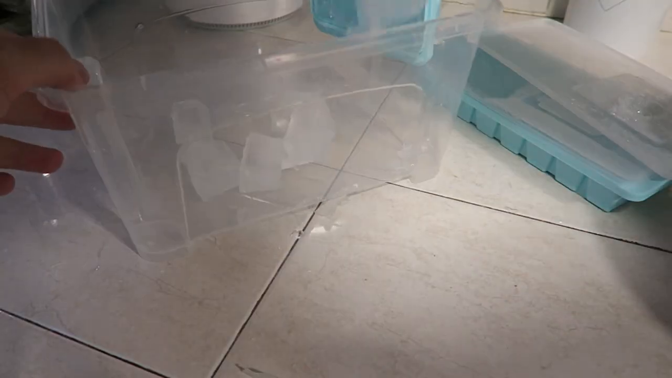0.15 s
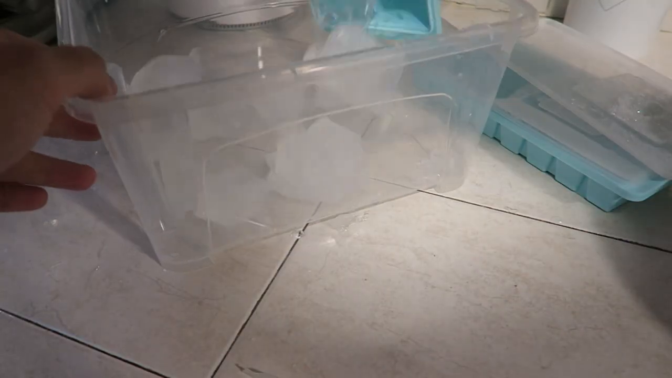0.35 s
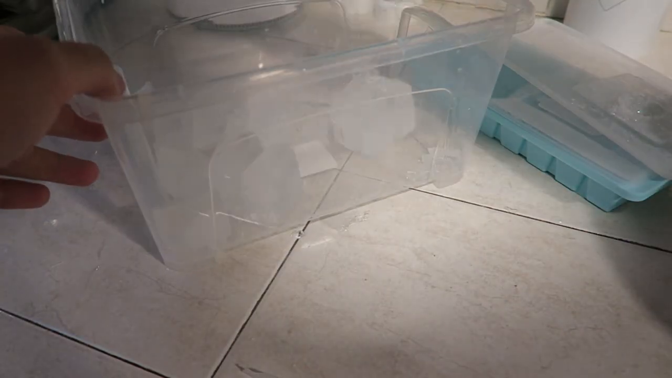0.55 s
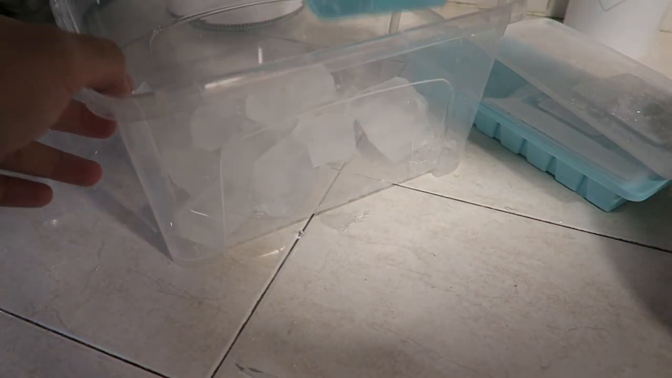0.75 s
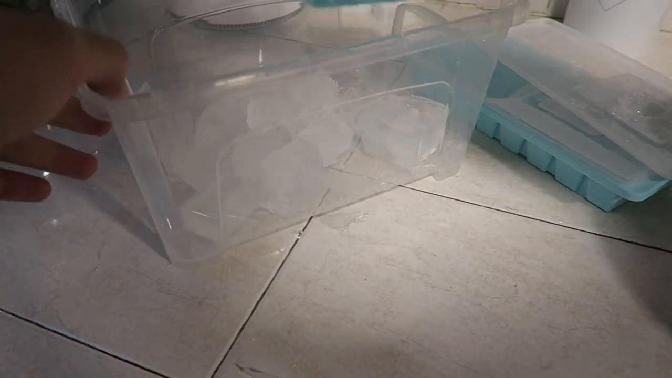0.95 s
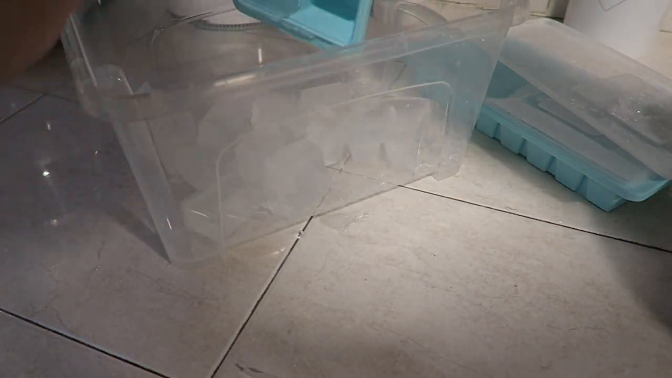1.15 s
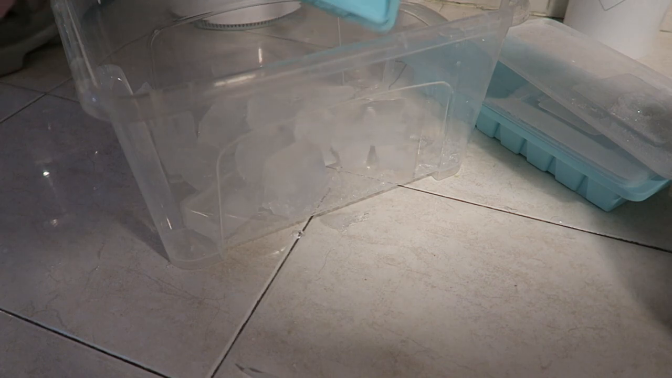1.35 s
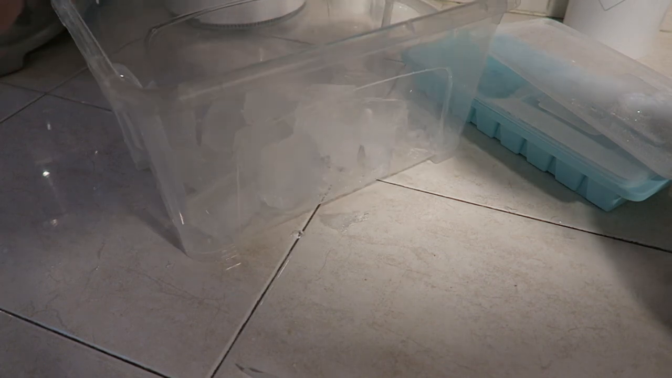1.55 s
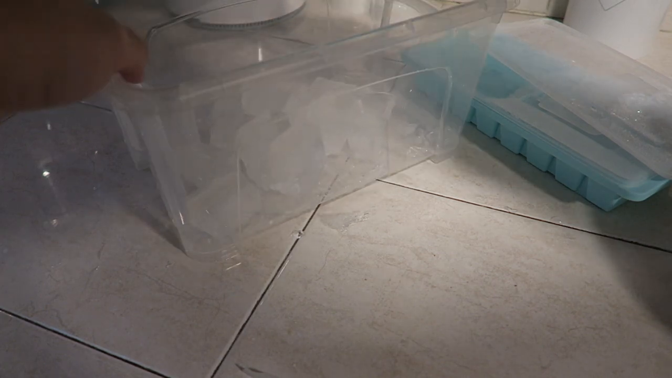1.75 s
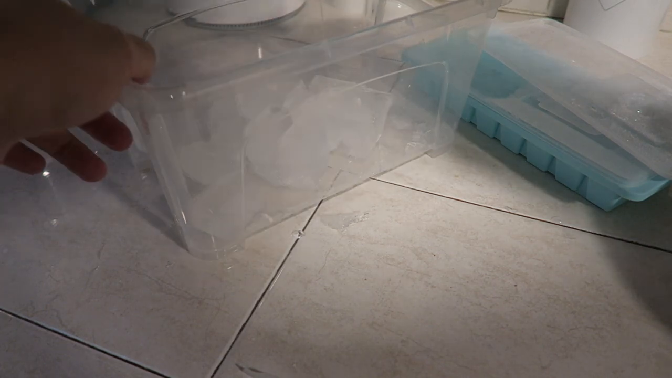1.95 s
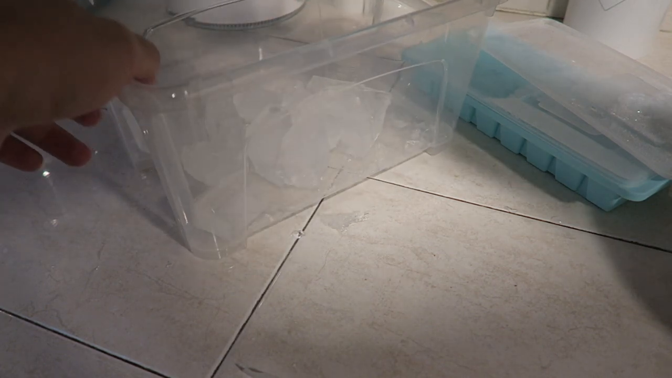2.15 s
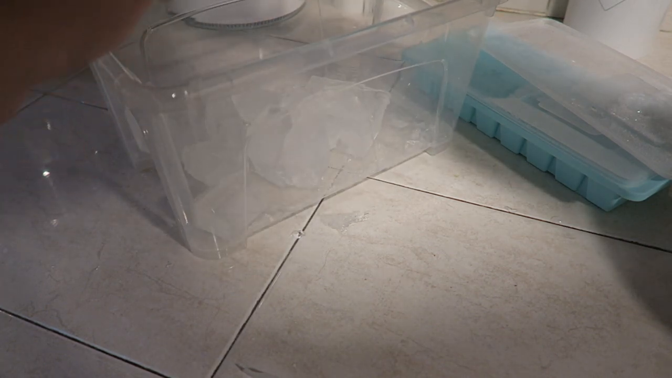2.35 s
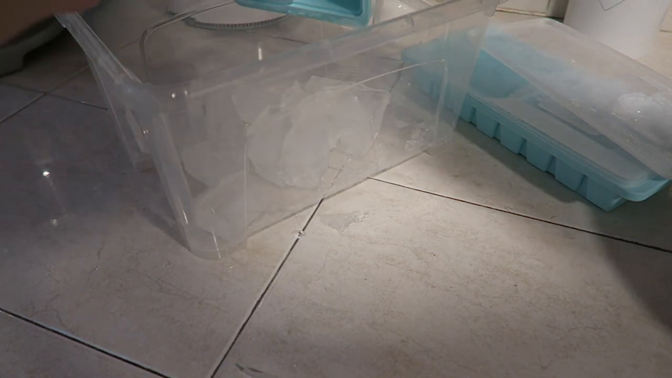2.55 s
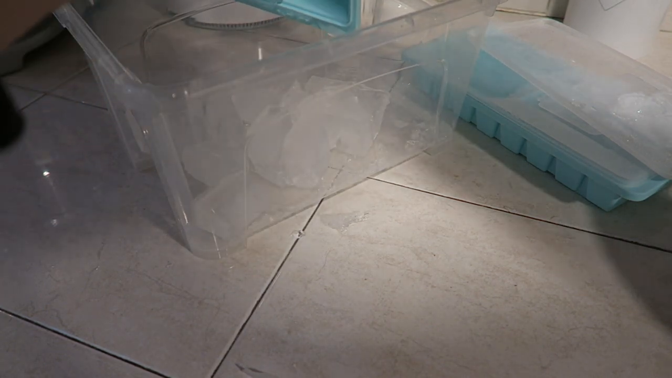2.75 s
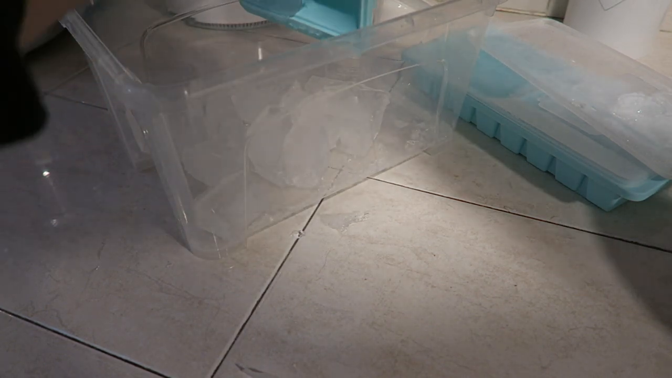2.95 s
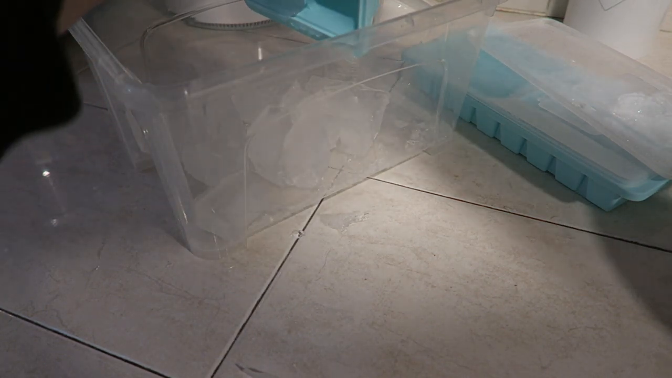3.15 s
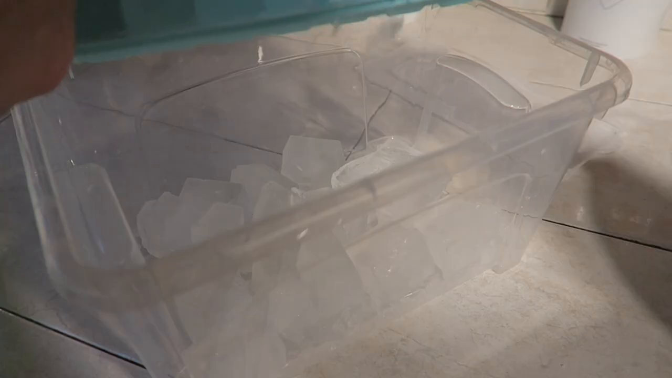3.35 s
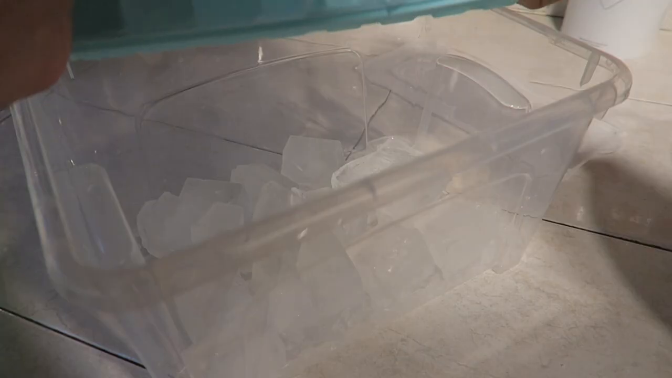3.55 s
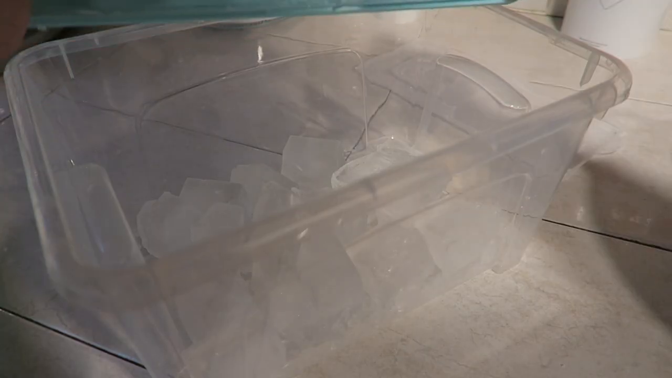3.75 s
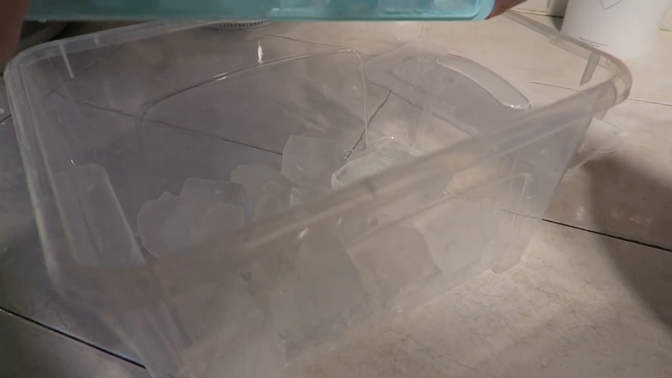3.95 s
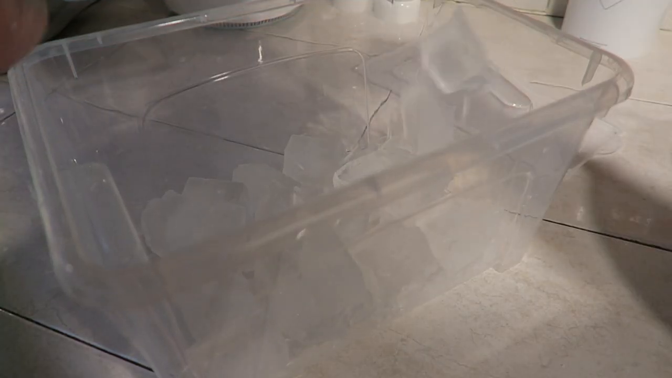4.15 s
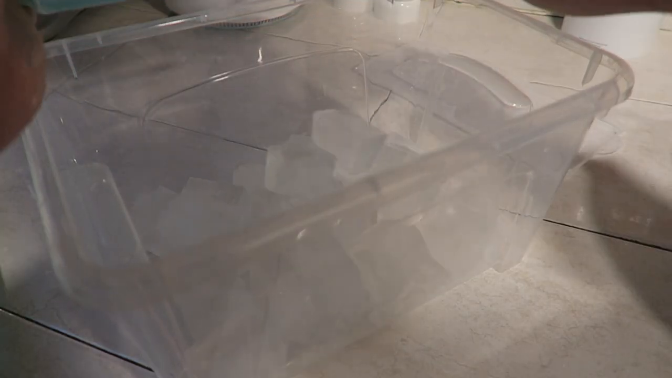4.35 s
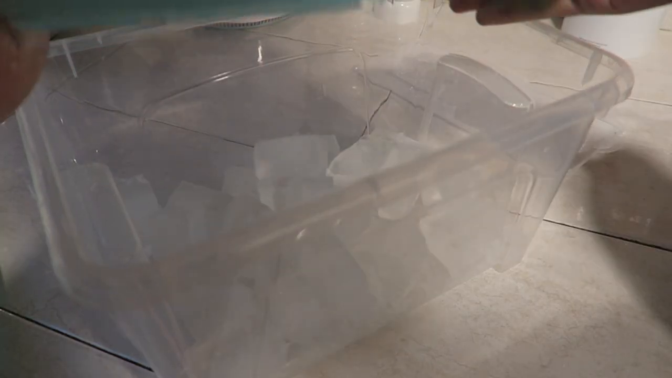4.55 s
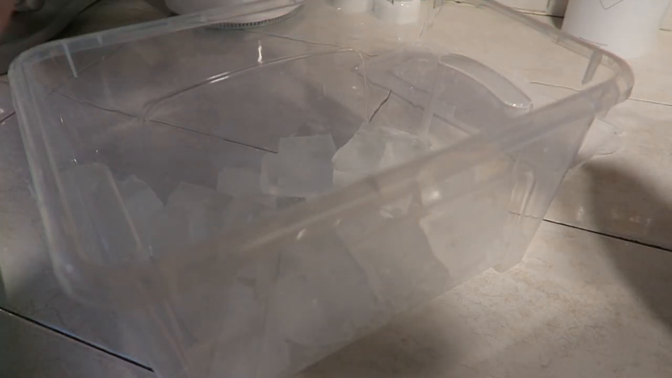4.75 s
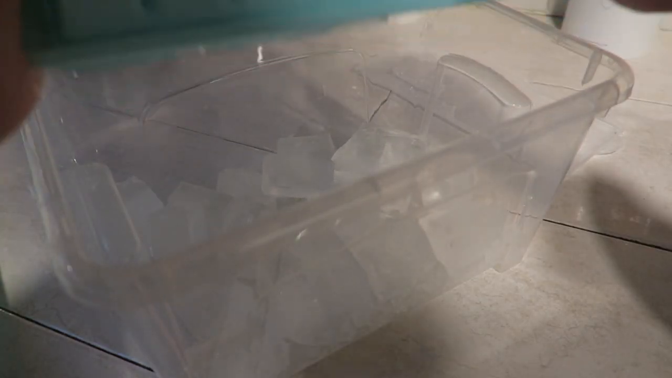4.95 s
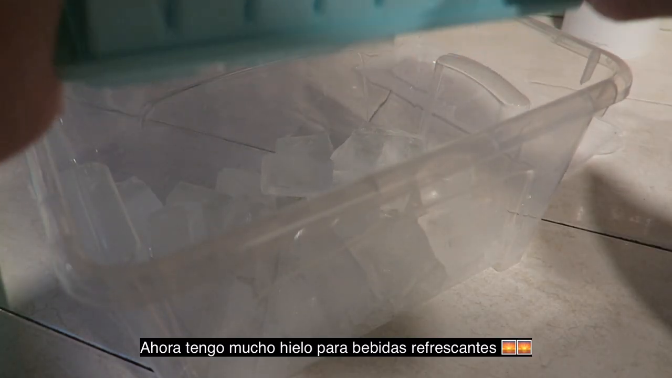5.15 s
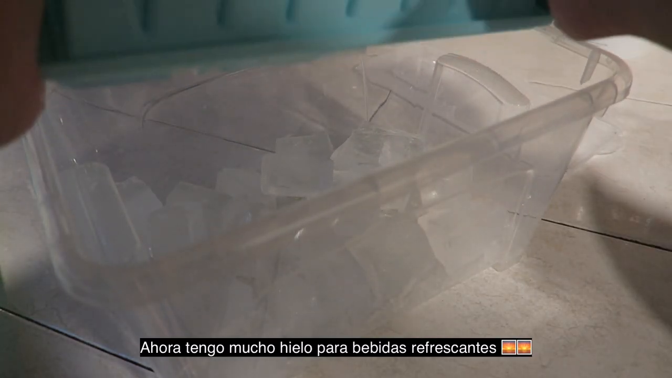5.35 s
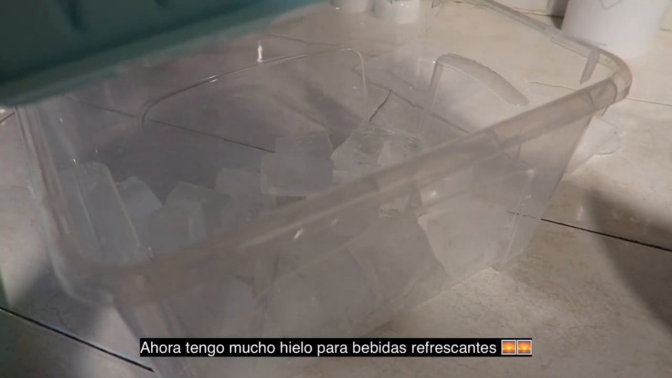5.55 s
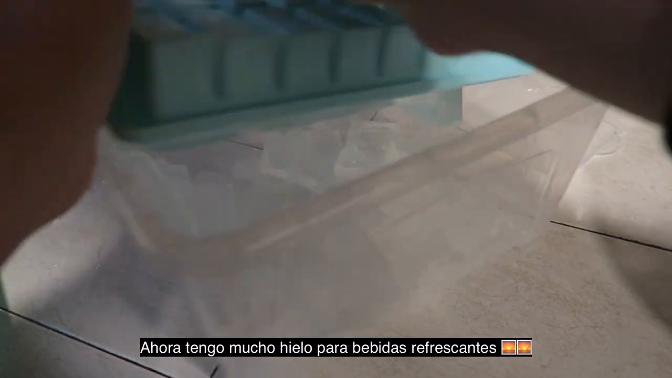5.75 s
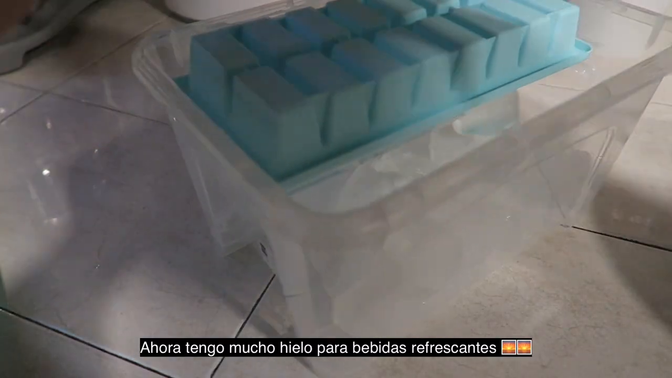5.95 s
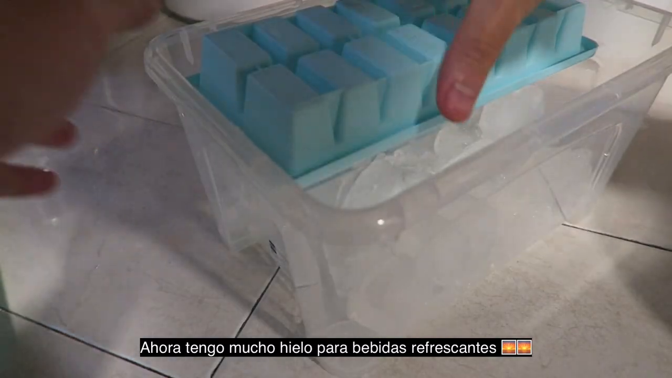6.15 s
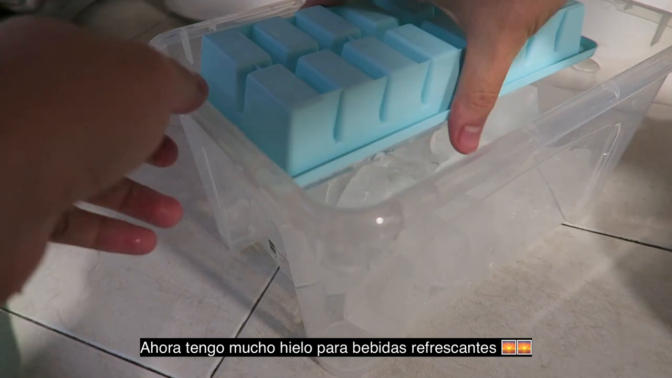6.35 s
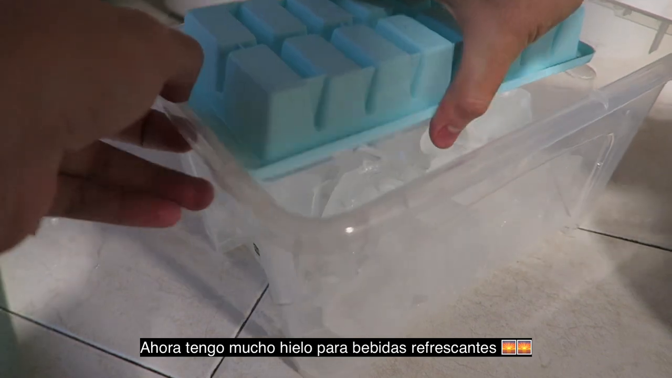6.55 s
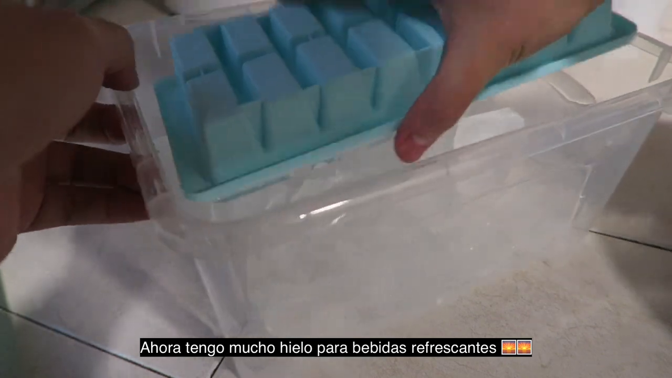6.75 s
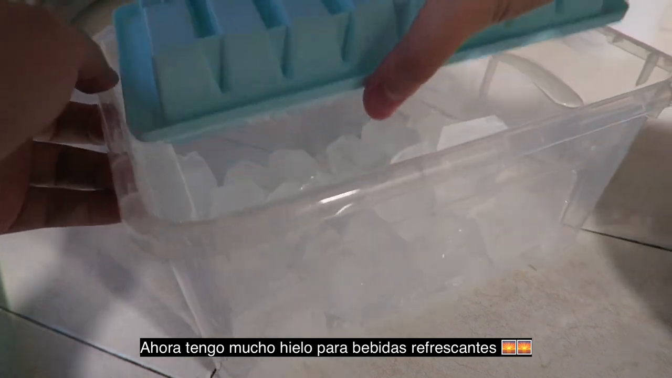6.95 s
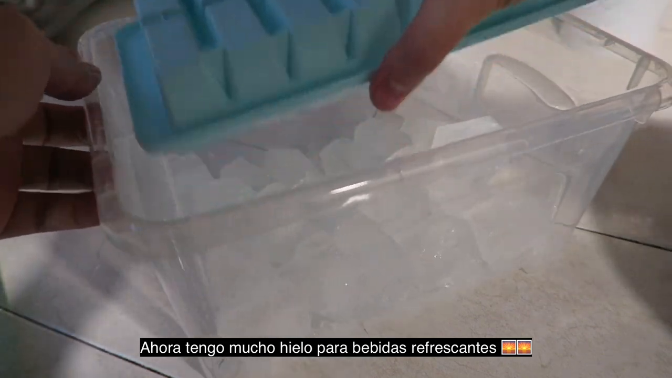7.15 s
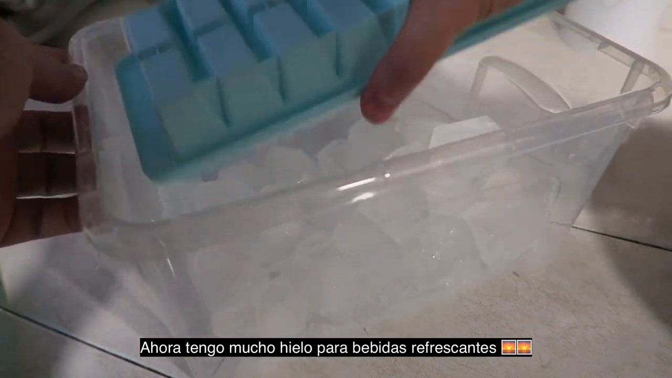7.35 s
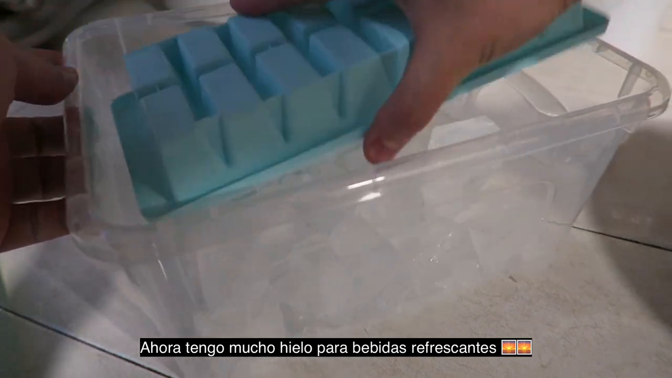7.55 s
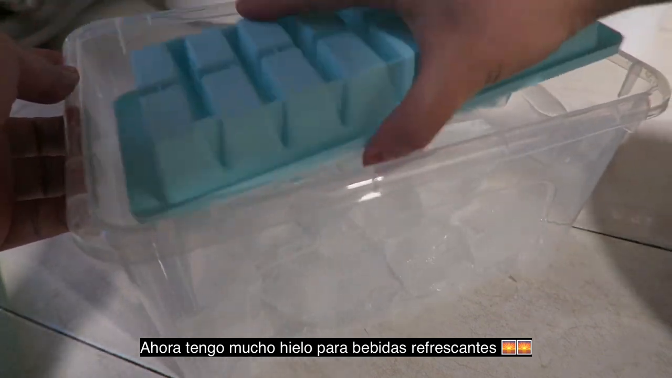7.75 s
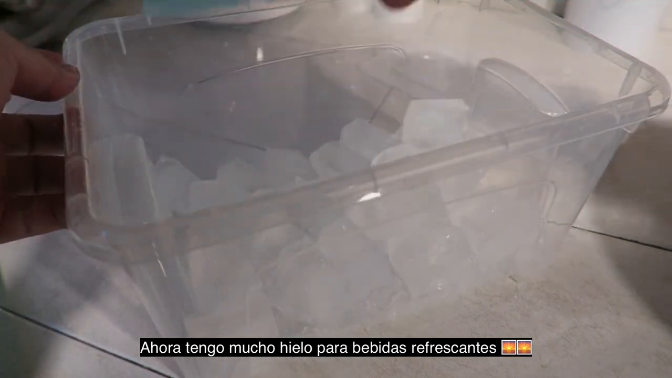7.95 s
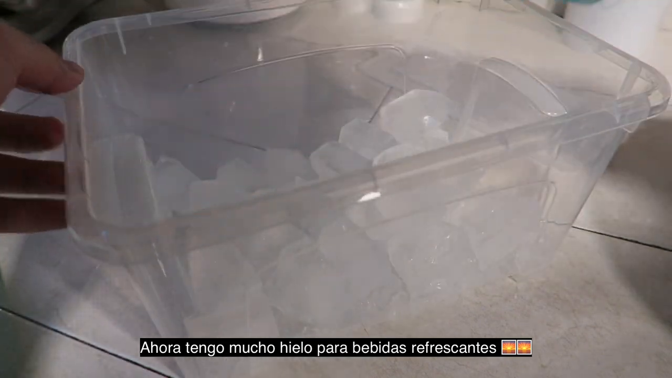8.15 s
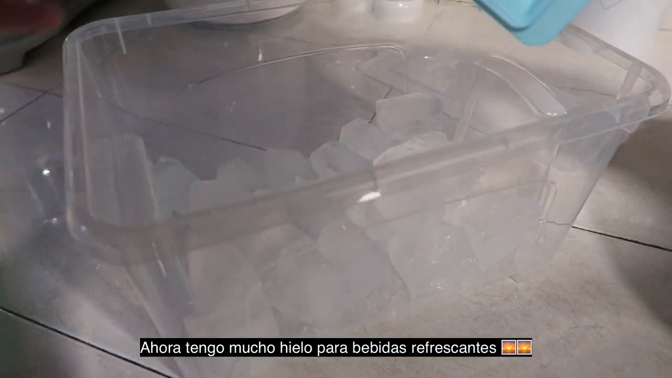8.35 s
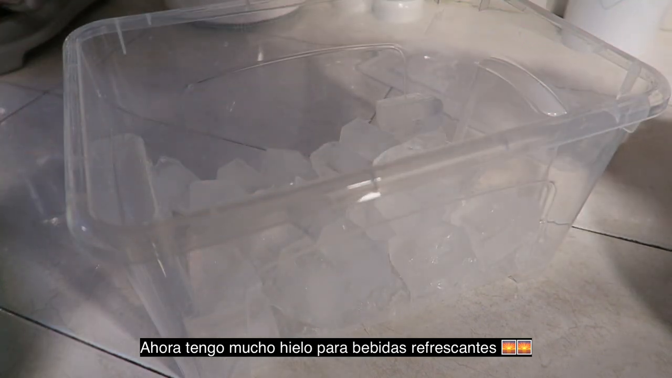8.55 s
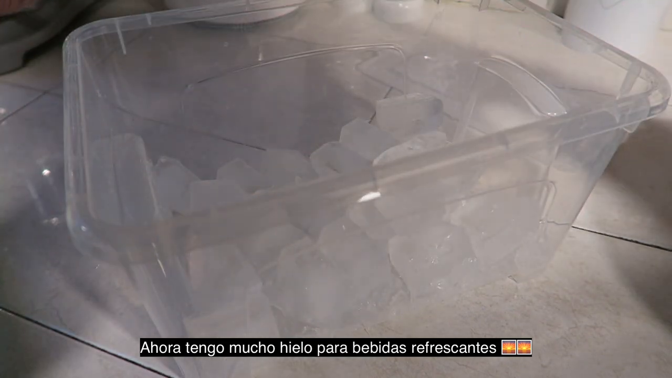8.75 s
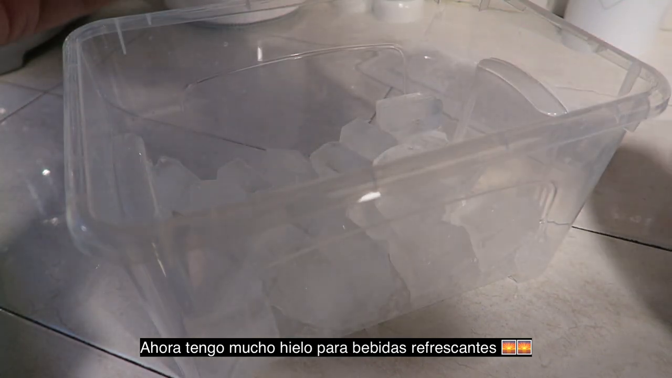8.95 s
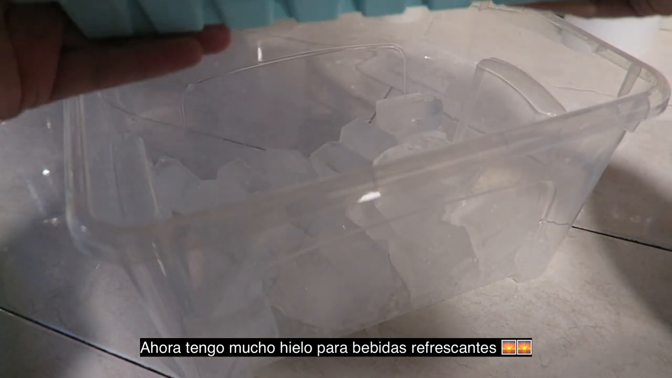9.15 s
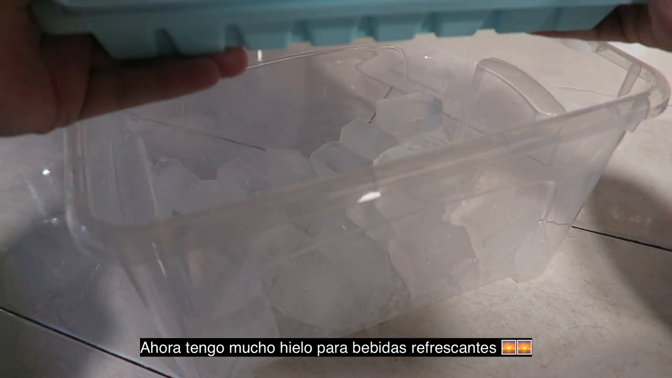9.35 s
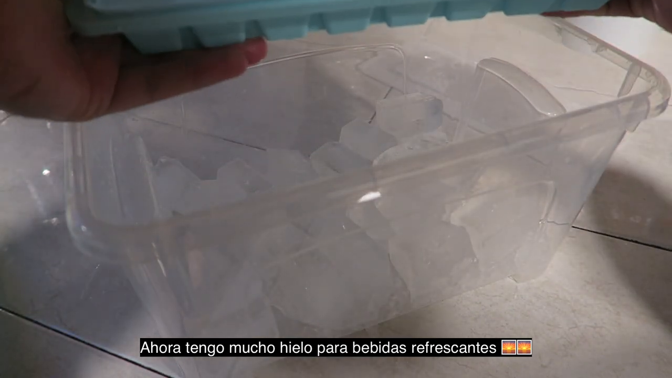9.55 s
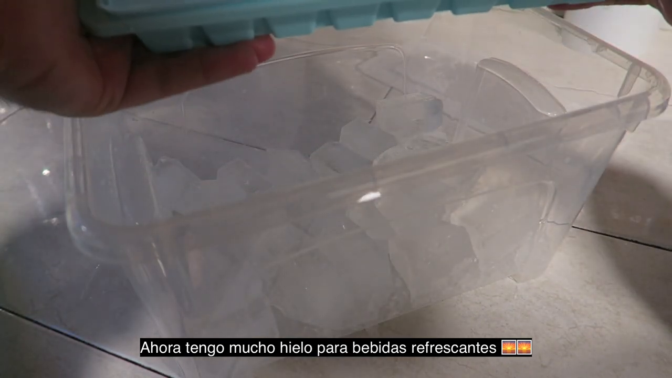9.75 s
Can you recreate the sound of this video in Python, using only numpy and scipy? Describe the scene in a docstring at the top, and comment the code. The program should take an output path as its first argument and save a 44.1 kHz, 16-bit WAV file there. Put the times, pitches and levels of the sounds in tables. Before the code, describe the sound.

Ice cubes creak and crack loose from a plastic tray, clatter and clink into a hollow plastic bin, then a tray bangs repeatedly on its rim.

```python
"""Over a low hum that comes and goes in level, a heap of ice cubes slides in a plastic bin, a tray creaks
and ice scrapes in it. Cubes tumble in and clink; later rubs and cracks come from the tray, and the nudged
bin bumps dully. From the sixth second a tray is banged on the rim, and a motor slowly runs up below the hum.
Bin and trays are banks of decaying modes struck by many contacts, creak and slides are random contacts,
scrapes are noise in a gliding resonance, hum and motor are sines, and dying noise forms the hard kitchen."""
import sys
import numpy as np
from scipy import signal
from scipy.fft import rfft, irfft, next_fast_len
from scipy.io import wavfile
from scipy.ndimage import uniform_filter1d

SR = 44100
rng = np.random.default_rng(int(sys.argv[2]) if len(sys.argv) > 2 else 0)


def generate_wav(signal):
    """Clip the signal to [-1, 1] and save it as 16-bit WAV at the path in sys.argv[1]."""
    frames = np.transpose(np.atleast_2d(signal))
    scaled = np.clip(frames, -1, 1) * 32767
    pcm = np.round(scaled).astype(np.int16)
    wavfile.write(sys.argv[1], SR, pcm)


N = 432159
TIME = np.arange(N) / SR   # s

# Frequency registers of the bin: wall, thump, hollow ring, tick.
# Each row: lower edge in Hz, upper edge in Hz.
BIN_REGISTERS = [(700, 2500), (60, 350), (350, 700), (2500, 16000)]
# Frequency registers of the tray: body, snap, splinter.
# Each row: lower edge in Hz, upper edge in Hz.
TRAY_REGISTERS = [(200, 2500), (2500, 7000), (7000, 16000)]
# The tray is banged on the rim, one edge touching first.
# Each row: time in seconds, wall level in dB before gain, tick in dB relative to the wall before gain,
# panel level in dB, panel pitch in Hz, first touch in dB relative to the wall, its lead in seconds.
BANGS = [(5.729, -28.5, -4, -48, 620, -0.5, 0.025), (6.823, -31, 0.5, -21.5, 474, 0.5, 0.0092),
         (7.078, -27, -4, -25, 415, -17, 0.0032), (7.326, -32, 1, -24, 464, -6, 0.02),
         (7.573, -28, -2, -29, 455, -8.5, 0.021), (7.811, -32, 2, -47, 490, -7.5, 0.0057),
         (8.247, -40.5, -2, -44.5, 453, -1.5, 0.022)]

CUTOFF_HZ = 15800
FILL_DB_PER_S = 1.2   # the growing heap damps the thump of the bin floor
PANEL_ATTACK_S, PANEL_T60_S = 0.0025, 0.036


def from_db(db):
    """Level to amplitude: 20 dB are a factor of ten."""
    return 10 ** (np.asarray(db) / 20)


def at_hz(points, hz):
    """Spectral interpolation of a (Hz, value) table along a logarithmic frequency axis."""
    points = np.array(points)
    return np.interp(np.log(np.maximum(hz, 1)), np.log(points[:, 0]), points[:, 1])


def unit(x):
    """Energy normalisation: the squares of each row sum to 1."""
    return x / np.sqrt(np.sum(x ** 2, axis=-1, keepdims=True) + 1e-20)


def fade(t, t60):
    """Exponential decay, 60 dB down after t60."""
    return np.exp(-np.log(1000) * t / t60)


def place(times, sounds):
    """Linear superposition of short sounds on the time line."""
    out = np.zeros(N + SR)
    for s, sound in zip(times, sounds):
        start = int(np.clip(s * SR, 0, N))
        out[start:start + len(sound)] += sound
    return out[:N]


def ringing(hz, t60):
    """Free vibration: dying sines, one per row, until the longest has lost 40 dB."""
    t = np.arange(int(SR * np.max(t60) * 2 / 3)) / SR
    return fade(t, t60) * np.sin(2 * np.pi * hz * t)


def plastic(colour, strong_modes, t60_mid, damping_slope, count=420):
    """Modal density of a plastic body: crowded modes whose decay depends on pitch, plus a few strong ones."""
    lowest_hz = colour[0][0]
    hz = np.linspace(np.sqrt(lowest_hz), np.sqrt(CUTOFF_HZ), count) ** 2
    hz = hz * (1 + 0.0032 * rng.standard_normal(count))
    spacing_db = 10 * np.log10(np.sqrt(hz / 440))   # modes lie further apart with pitch
    crowd_t60 = t60_mid * (hz / 1000) ** -damping_slope   # t60_mid holds at 1 kHz
    crowd = np.column_stack([hz, at_hz(colour, hz) + spacing_db, crowd_t60])
    hz, level_db, t60 = np.vstack([crowd, *strong_modes]).T[:, :, None]
    return hz[:, 0], from_db(level_db) * ringing(hz, t60)


def chatter(rows, spread_s, rebound_db, count):
    """Repeated impact: a first contact and a quick run of uneven rebounds share the energy of one event."""
    rows = np.array(rows)
    chance = rng.random((len(rows), 2, count))
    order = np.arange(count)
    later = order > 0
    size_db = later * (rebound_db + 10 * (chance[:, 0] - .5))
    size_db -= 10 * np.log10(np.sum(from_db(size_db) ** 2, axis=1, keepdims=True))
    delay_s = later * (order - chance[:, 1] * .5) / count * spread_s
    runs = np.repeat(rows, count, axis=0)
    runs[:, 0] += delay_s.ravel()
    runs[:, 1] += size_db.ravel()
    return runs.T


def strike(body, registers, times, levels_db, patchy_db, dwell_s, size=7):
    """Modal excitation: the moving point of contact decides which groups of modes each push favours."""
    in_phase = 0.2   # part of a push that all modes take in step: the hard click of the contact
    hz, rings = body
    spots = rng.standard_normal((N // 500, len(hz)))
    spots = np.sqrt(size) * uniform_filter1d(spots, size, axis=1)   # neighbouring modes go together
    favour_db = patchy_db * spots[(times / dwell_s).astype(int) % len(spots)]
    push = (rng.choice([-1, 1], favour_db.shape) + in_phase) * from_db(favour_db)
    sounds = 0
    for (low, high), level_db in zip(registers, levels_db):
        inside = (hz >= low) & (hz < high)
        sounds = sounds + from_db(level_db)[:, None] * unit(push[:, inside] @ rings[inside])
    return place(times, sounds)


def contacts(rows, attack_s, slope_db_per_s, release_db_per_s, uneven_db, count):
    """Stochastic friction: random small contacts in spells that swell, hold on a slope and die away."""
    rows = np.array(rows)
    spans = attack_s + np.abs(rows[:, 1]) + 20 / release_db_per_s
    ends = np.cumsum(spans)
    # all spells are laid end to end, and the contacts are spread over them
    moments = (np.arange(count) + rng.uniform(-1, 1, count)) / count % 1 * spans.sum()
    spell = np.searchsorted(ends[:-1], moments)
    start, length, level, colour = rows[spell].T
    age = moments - (ends - spans)[spell] - attack_s   # negative during the swell
    shape_db = 20 * np.minimum(age / attack_s, 0)
    shape_db += slope_db_per_s * np.clip(age, 0, length)
    shape_db -= release_db_per_s * np.maximum(age - length, 0)
    scatter_db = uneven_db * np.clip(rng.standard_normal(count), -2, 2)
    return start + age, level + shape_db + scatter_db, colour


def knocks(bin_body, rows, thump_db, tick_db, spread_s, rebound_db, rocking_db, count=4):
    """Impact and rebound: a blow on the bin, then jolted cubes rock against each other for a moment."""
    thump_follows = 0.22   # dB of thump per dB of hollow ring
    blows = chatter(rows, spread_s, rebound_db, count=count)
    rocking = chatter(rows, spread_s=.06, rebound_db=-0.5, count=5)
    rocking[1] += rocking_db
    s, wall, hollow, tick = np.hstack([blows, rocking])
    thump = wall + thump_db + thump_follows * hollow - FILL_DB_PER_S * s
    levels = [wall, thump, wall + hollow, wall + tick + tick_db]
    return strike(bin_body, BIN_REGISTERS, s, levels, patchy_db=3.5, dwell_s=.05)


def panel(s, level_db, hz, hold_s):
    """Forced, then damped vibration: one panel swings at its own pitch while pushed, then stops quickly."""
    overtone_ratio, overtone_db = 1.88, -10   # second mode of a panel
    t = np.arange(SR // 10) / SR
    envelope = np.minimum(t / PANEL_ATTACK_S, 1) * fade(np.maximum(t - hold_s, 0), PANEL_T60_S)
    phase = 2 * np.pi * hz[:, None] * t
    swing = np.sin(phase) + from_db(overtone_db) * np.sin(overtone_ratio * phase)
    return place(s, from_db(level_db)[:, None] * envelope * swing)


def glide(x, hz, width_hz):
    """Resonance with a moving centre: shift it to zero, smooth, and shift back; gain 1 on top."""
    turn = np.exp(2j * np.pi * np.cumsum(hz) / SR)
    keep = np.exp(-np.pi * width_hz / SR)
    smooth = signal.lfilter([1 - keep], [1, -keep], (x + 1e-18) / turn)
    return 2 * np.real(turn * smooth)


def hum(hum_db, boom_db):
    """Superposed tones: a low hum comes and goes in level; a motor runs up and swells near a room resonance."""
    # Level of the low hum, which comes and goes. Each row: time in seconds, level in dB before gain.
    hum_levels = [(0.0, -53), (0.49, -75.5), (4.12, -60.5), (4.42, -80), (5.73, -65), (5.95, -71),
                  (6.5, -67), (7.67, -84.5), (9.61, -57.5), (9.8, -62)]
    # Faint steady tones. Each row: pitch in Hz, level in dB.
    faint_tones = [(119.5, -81), (226, -83.5), (721, -89.5)]
    hum_hz = 59.2
    run_up_s, run_up_hz, run_up_octaves_per_s = 6.5, 39.2, 0.068   # the motor starts and gathers speed
    boom_hz, boom_width_hz = 51.7, 1.7   # the room resonance
    times, levels = np.transpose(hum_levels)
    tones = from_db(np.interp(TIME, times, levels) + hum_db) * np.sin(2 * np.pi * hum_hz * TIME)
    since_start = TIME - run_up_s
    rising_hz = run_up_hz * 2 ** (run_up_octaves_per_s * since_start)
    resonance = 1 / np.hypot(1, 2 * (rising_hz - boom_hz) / boom_width_hz)
    swell = np.clip(since_start, 0, 1) * resonance
    tones += from_db(boom_db) * swell * np.sin(2 * np.pi * np.cumsum(rising_hz) / SR)
    tones += sum(from_db(db) * np.sin(2 * np.pi * hz * TIME) for hz, db in faint_tones)
    return np.sqrt(2) * tones   # levels are effective values


def air(level_db):
    """Spectrally shaped noise: a steady soft rush, its level taken above 150 Hz."""
    # Colour of the rush. Each row: frequency in Hz, relative level in dB per Hz.
    air_colour = [(12, -46.5), (20, -9), (43, -16), (65, -13), (81, -9.5), (104, -20), (158, -18),
                  (234, -9.5), (624, -28), (718, -26), (825, -32.5), (1960, -36.5), (16000, -56)]
    size = next_fast_len(N)
    hz = np.arange(size // 2 + 1) * SR / size
    gain = from_db(at_hz(air_colour, hz))
    gain /= np.sqrt(np.mean((gain * (hz > 150)) ** 2))
    return from_db(level_db) * irfft(rfft(rng.standard_normal(size)) * gain, size)[:N]


def side_air(level_db, edge_hz):
    """Independent noise: above the bass the soft rush differs between left and right."""
    return signal.sosfilt(signal.butter(1, edge_hz, "high", fs=SR, output="sos"), air(level_db))


def tumble(bin_body, gain_db, thump_db, hollow_db, tick_db):
    """Granular flow: the heap shifts in many small contacts, which shake the floor of the bin too."""
    # The heap slides. Each row: time of full level in seconds, hold in seconds, wall level in dB before gain,
    # hollow ring in dB relative to the wall before gain.
    slide_rows = [(0.0, .07, -65, 2.5), (0.17, .5, -43, -1.5), (0.69, .23, -52, -3.5),
                  (1.06, .06, -70, -0.5), (1.33, .06, -76, 0), (1.58, .07, -53.5, -2), (1.79, .1, -64, -3),
                  (2.13, .04, -63, 1.5), (4.25, .22, -50, 2.5), (4.48, .31, -55, -3.5), (5.73, .05, -42, 3),
                  (5.87, .26, -48.5, -4), (6.29, .35, -62, 4.5), (6.69, .25, -56.5, 1.5),
                  (7.96, .04, -61, 2)]
    attack_s, sag_db_per_s, release_db_per_s = .02, 9.5, 100
    # a bang shakes the heap: hold, level relative to the bang before either gain, hollow ring
    jolt_s, jolt_db, jolt_hollow_db = .06, -32.5, 3.5
    jolts = [(s + attack_s, jolt_s, db + jolt_db, jolt_hollow_db) for s, db, *_ in BANGS]
    s, wall, hollow = contacts(slide_rows + jolts, attack_s, -sag_db_per_s, release_db_per_s,
                               uneven_db=2.5, count=950)
    levels = [wall, wall + thump_db - FILL_DB_PER_S * s, wall + hollow + hollow_db, wall + tick_db]
    return from_db(gain_db) * strike(bin_body, BIN_REGISTERS, s, levels, patchy_db=2.0, dwell_s=.025)


def wall_ring(x, gain_db, width_hz):
    """Mass loading: the long wall resonates with every contact, and its pitch sinks as ice loads it."""
    wall_hz, sag_hz_per_s = 1338, 16
    return from_db(gain_db) * glide(x, wall_hz - sag_hz_per_s * TIME, width_hz)


def creak(tray_body, gain_db, snap_db, splinter_db):
    """Stick-slip friction: ice slips against the bending tray, harder as the twist grows."""
    # The tray is twisted. Each row: time when the swell is over in seconds, hold in seconds,
    # body level in dB before gain, snap in dB relative to the body before gain.
    twist_rows = [(0.095, .1, -51, -4), (3.39, .04, -59, -0.5), (3.62, .15, -55, 1),
                  (4.03, .14, -56.5, -0.5), (9.28, 0.027, -74.5, 0), (9.52, .22, -77, 5),
                  (9.77, .03, -68, 11.5)]
    s, body, snap = contacts(twist_rows, attack_s=0.04, slope_db_per_s=13.5, release_db_per_s=350,
                             uneven_db=4.0, count=1400)
    levels = [body, body + snap + snap_db, body + snap + splinter_db]
    return from_db(gain_db) * strike(tray_body, TRAY_REGISTERS, s, levels, patchy_db=7.0, dwell_s=0.016)


def scrapes(gain_db, width_hz, grit_db):
    """Friction-driven resonance: dense uneven slips of ice drive a pitch that glides as the contact shifts."""
    # Ice scrapes along the tray. Each row: start in seconds, length in seconds, first pitch in Hz,
    # last pitch in Hz, level in dB before gain.
    scrape_rows = [(0.086, 0.052, 2600, 1893, -46.5), (0.137, 0.072, 2400, 4300, -47.5),
                   (3.969, 0.032, 5320, 5900, -56), (4.011, .05, 5950, 5140, -53.5),
                   (4.061, 0.035, 5800, 6810, -59), (4.065, 0.053, 4220, 4390, -53.5),
                   (9.25, 0.039, 2140, 2250, -59.5)]
    noises = rng.standard_normal((len(scrape_rows), 2, SR // 2))
    sounds = []
    for (_, length, from_hz, to_hz, level_db), (slips, sizes) in zip(scrape_rows, noises):
        n = int(length * SR)
        uneven_slips = (slips * from_db(grit_db * sizes))[:n]
        rub = glide(uneven_slips, np.linspace(from_hz, to_hz, n), width_hz)
        sounds.append(from_db(level_db) * rub / rub.std() * signal.windows.tukey(n))
    return from_db(gain_db) * place([row[0] for row in scrape_rows], sounds)


def clumps(damped_body, gain_db, hollow_db):
    """Damping by added load: several cubes land in one crunch, and the struck panel rings out."""
    # A clump hits one panel squarely. Each row: time in seconds, wall level in dB before gain,
    # tick in dB relative to the wall before gain, panel level in dB, panel pitch in Hz.
    clump_rows = [(0.165, -23.5, 6, -22, 263), (0.306, -20, 4, -26, 410), (0.507, -24.5, 1, -33, 1378),
                  (1.96, -19.5, -1.5, -26.5, 1379), (3.417, -30.5, 6, -36, 1060),
                  (4.218, -17, 1, -14.5, 398.3), (5.85, -26.5, -6, -30.5, 830)]
    rows = [(s, db, hollow_db, tick) for s, db, tick, _, _ in clump_rows]
    s, _, _, panel_db, hz = np.transpose(clump_rows)
    crunch = knocks(damped_body, rows, thump_db=-0.5, tick_db=-8.0, spread_s=.012,
                    rebound_db=3.0, rocking_db=-17.0, count=7)
    return from_db(gain_db) * crunch + panel(s, panel_db, hz, hold_s=0.0029)


def clinks(gain_db, upper_db, detune):
    """Free vibration of small solids: two cubes touch twice and ring glassily, higher modes shorter."""
    # A free cube rings. Each row: time in seconds, level in dB before gain,
    # upper modes in relative dB before gain, t60 of the main mode in seconds.
    clink_rows = [(0.1667, -40, -8.5, 0.035), (0.2455, -42, -17, 0.06), (1.31, -78, -30, 0.11),
                  (4.2609, -46, 3, 0.05), (4.332, -42, -10, 0.078), (4.388, -30.5, -18.5, .038),
                  (5.238, -76, 0, 0.06)]
    # Modes of an average cube, the second row being the main one. Each row: pitch in Hz, relative level in dB.
    cube_modes = [(3112, -19), (4325, 5), (4880, -18), (7020, 4), (7860, -11)]
    upper_modes_hz, main_hz = 6000, cube_modes[1][0]
    s, level, upper, t60 = chatter(clink_rows, spread_s=0.0079, rebound_db=-7.5, count=2)
    pitch = 1 + detune * rng.standard_normal((len(s), 1))   # no two are quite the same size
    sounds = 0
    for hz, db in cube_modes:
        level_db = level + db + (hz > upper_modes_hz) * (upper + upper_db)
        rings = ringing(hz * pitch, t60[:, None] * main_hz / hz)
        sounds = sounds + place(s, from_db(level_db)[:, None] * rings)
    return from_db(gain_db) * sounds


def drops(bin_body, gain_db, hollow_db, clack_db):
    """Impact excitation: cubes fall on the heap and against the walls; each spot clacks at another pitch."""
    # Cubes land. Each row: time in seconds, wall level in dB before gain,
    # hollow ring in dB relative to the wall before gain.
    drop_rows = [(0.195, -36, 6), (0.231, -25.5, -3), (0.259, -28, 0), (0.364, -26.5, -11.5),
                 (0.386, -39.5, 8), (0.407, -29.5, -11), (0.421, -37, 2), (0.535, -33, 1), (0.565, -32, -8),
                 (0.639, -32.5, 2), (0.652, -32, -16), (0.679, -45, -9), (0.776, -30.5, -7),
                 (0.868, -33.5, -9), (0.897, -34, -3), (0.936, -45, -15), (1.037, -44.5, -3),
                 (1.314, -53, -16), (1.507, -36, -2), (1.524, -37, -6), (1.561, -33, -5.5),
                 (1.574, -25, -4), (1.598, -29.5, -3.5), (1.64, -34.5, -2), (1.808, -47.5, -12.5),
                 (2.123, -41.5, -5), (2.137, -39, -3), (4.262, -32, -13), (4.297, -35.5, -9),
                 (4.332, -30, -7), (4.367, -33, -6), (4.387, -26.5, -8), (4.469, -34.5, -4),
                 (4.694, -32, -5.5), (4.755, -39.5, 2), (4.782, -38.5, -5), (5.714, -21.5, -10),
                 (5.761, -29.5, 5), (5.861, -26, 0), (5.882, -28, 1.5), (5.924, -33.5, 5),
                 (5.967, -33.5, 0.5), (6.001, -27.5, -2.5), (6.072, -33.5, 2), (6.101, -41, 6),
                 (6.281, -37.5, -5), (6.303, -40, -9), (6.571, -41.5, 2), (6.706, -43.5, 4),
                 (6.785, -31.5, -10), (7.021, -39, -9.5), (7.781, -43, -5), (7.885, -39.5, -6),
                 (7.943, -31, -6), (8.304, -47.5, -7)]
    rows = [(s, db, hollow + hollow_db, 0) for s, db, hollow in drop_rows]
    s, level, _ = np.transpose(drop_rows)
    clack_hz = np.exp(rng.uniform(np.log(750), np.log(2400), len(s)))
    clacks = panel(s, level + clack_db, clack_hz, hold_s=PANEL_ATTACK_S)
    landings = knocks(bin_body, rows, thump_db=1.5, tick_db=-4, spread_s=.009, rebound_db=-2.0, rocking_db=-8.0)
    return clacks + from_db(gain_db) * landings


def rustles(tray_body, gain_db):
    """Soft friction: fingers or loose ice slip over the tray in short, dull rubs that excite its resonance."""
    # Each row: time of full level in seconds, body level in dB before gain.
    rustle_rows = [(1.79, -78), (3.286, -77.5), (6.221, -60.5), (6.421, -66.5), (6.56, -58.5),
                   (6.598, -55.5), (6.71, -56), (8.101, -70), (8.63, -79.5), (8.73, -76.5), (8.972, -72.5),
                   (9.08, -77.5), (9.131, -74)]
    softness_db = -6.5   # snap relative to body; the splinter register gets it twice
    rub_hz, rub_width_hz = 1750, 880   # the tray's resonance under a rub
    spells = [(s, 0, db, softness_db) for s, db in rustle_rows]
    s, body, soft = contacts(spells, attack_s=0.033, slope_db_per_s=0, release_db_per_s=301,
                             uneven_db=5.5, count=320)
    levels = [body, body + soft, body + 2 * soft]
    rubs = strike(tray_body, TRAY_REGISTERS, s, levels, patchy_db=3.0, dwell_s=.05)
    return from_db(gain_db) * (rubs + glide(rubs, np.full(N, rub_hz), rub_width_hz))


def cracks(tray_body, gain_db, snap_db, splinter_db):
    """Sudden release of strain: a cube lets go of the tray in a quick run of snaps."""
    # Each row: time in seconds, body level in dB before gain, snap in dB relative to the body before gain.
    crack_rows = [(2.179, -46.5, -10), (2.324, -54.5, -14), (2.391, -51.5, -22), (2.451, -52, -25),
                  (2.803, -41, -10.5), (2.86, -59.5, -11), (3.411, -35.5, -4), (3.417, -20, -13.5),
                  (3.463, -53, 7.5), (3.6, -35.5, -14), (3.645, -31, -16), (3.674, -30, -15),
                  (3.7, -33, -10), (3.729, -43, 0), (3.755, -35, -7), (3.769, -44, 0), (3.83, -34.5, -10),
                  (3.859, -39.5, -3.5), (4.0, -45, -5.5), (4.127, -37, -10), (4.147, -39.5, -11.5),
                  (4.163, -45.5, 5), (4.173, -31, -11), (4.209, -39, -5.5), (4.948, -48, -27),
                  (5.111, -60, -12), (7.078, -34.5, -7.5), (8.022, -54.5, -3.5), (8.171, -47.5, -20),
                  (9.262, -55, -11), (9.29, -39, -11.5), (9.307, -30.5, -21), (9.392, -35, -24),
                  (9.433, -62.5, 8), (9.577, -55, 4), (9.609, -25, -14.5), (9.673, -44, -10)]
    s, body, snap = chatter(crack_rows, spread_s=0.0016, rebound_db=-19.0, count=3)
    levels = [body, body + snap + snap_db, body + snap + splinter_db]
    return from_db(gain_db) * strike(tray_body, TRAY_REGISTERS, s, levels, patchy_db=2.5, dwell_s=0.028)


def bumps(bin_body, gain_db, hollow_db):
    """Soft impact favours low modes: the nudged bin answers with much thump and little tick."""
    # The bin bumps on the floor. Each row: time in seconds, wall level in dB before gain.
    bump_rows = [(3.897, -41.5), (4.054, -42.5), (4.975, -40.5), (5.15, -41.5), (5.436, -50),
                 (5.465, -55.5)]
    rows = [(s, db, hollow_db, 0) for s, db in bump_rows]
    return from_db(gain_db) * knocks(bin_body, rows, thump_db=6.0, tick_db=-10.0, spread_s=0.0065,
                                     rebound_db=-6.5, rocking_db=-2.5)


def bangs(rim_body, gain_db, hollow_db):
    """Double impact: one edge of the tray touches the rim, then its whole weight makes the bin's side boom."""
    rows = [(s, db, hollow_db, tick) for s, db, tick, *_ in BANGS]
    rows += [(s - lead, db + touch, hollow_db, 0) for s, db, *_, touch, lead in BANGS]
    s, _, _, panel_db, hz, _, _ = np.transpose(BANGS)
    crunch = knocks(rim_body, rows, thump_db=5, tick_db=-4.0, spread_s=0.013,
                    rebound_db=5.0, rocking_db=-8.5, count=7)
    return from_db(gain_db) * crunch + panel(s, panel_db, hz, hold_s=0.0059)


def bounces():
    """Mass on a spring: each bang presses the bin on the floor, and it springs back with a low thud."""
    bounce_hz, bounce_t60_s = 112.5, 0.3
    bounce_db = -14   # relative to the bang before its gain
    t = np.arange(SR // 3) / SR
    thud = np.sin(2 * np.pi * bounce_hz * t) * fade(t, bounce_t60_s)
    s, level = np.transpose(BANGS)[:2]
    return place(s, from_db(level + bounce_db)[:, None] * thud)


def low_cut(x, edge_hz):
    """Radiation efficiency: a small body radiates little below its lowest mode."""
    return signal.sosfilt(signal.butter(3, edge_hz, "high", fs=SR, output="sos"), x + 1e-18)


def walls(x, level_db, t60):
    """Convolution with decaying noise: reflections from floor and cupboards prolong each pitch that rings."""
    t = np.arange(SR // 3) / SR
    response = unit(rng.standard_normal(len(t)) * fade(t, t60) * (t > .004))
    return from_db(level_db) * signal.fftconvolve(x, response)[:N]


def echoes(x, levels_db, t60s, delay_s):
    """Diffuse reverberation: each band stores the energy it is fed and lets it die away as noise."""
    edges = np.geomspace(90, 16500, 23)
    white = rng.standard_normal((2, N))
    late = np.pad(x, (int(delay_s * SR), 0))[:N] + 1e-18
    out = 0
    for k, (low, high) in enumerate(zip(edges, edges[1:])):
        hz = np.sqrt(low * high)
        band_pass = signal.butter(2, [low, high], "band", fs=SR, output="sos")
        band, noise = signal.sosfilt(band_pass, [late, white[k % 2]])
        keep = fade(1 / SR, at_hz(t60s, hz)) ** 2   # energy left after one sample
        stored = signal.lfilter([1 - keep], [1, -keep], band ** 2)
        out = out + from_db(at_hz(levels_db, hz)) * np.sqrt(stored) * noise / noise.std()
    return out


def scene():
    """Direct and reverberant sound: near sources in a hard room; the sides differ most in the treble."""
    # Strongest modes of the loaded bin. Each row: pitch in Hz, relative level in dB, t60 in seconds.
    bin_modes = [(118.7, 2.5, 0.28), (211, 7.5, 0.067), (291, 3.5, 0.097), (336.4, 7.5, 0.035),
                 (427, 6.5, 0.17), (489.4, 4, 0.22), (526, 3.5, 0.22), (894, 6.5, 0.031)]
    # Hollow modes added when the rim is struck. Each row: pitch in Hz, relative level in dB, t60 in seconds.
    rim_modes = [(417.6, -2.5, 0.46), (488, 8, 0.27)]
    # Strongest modes of the tray. Each row: pitch in Hz, relative level in dB, t60 in seconds.
    tray_modes = [(1290, 14.5, 0.02), (2170, 0, 0.036), (3245, 11, .025)]
    # Spread of the crowded modes of the bin. Each row: frequency in Hz, relative level in dB per Hz.
    bin_colour = [(47, -36.5), (80, -30), (112, -8.5), (248, -2), (493, 2.5), (588, -7.5), (785, -3.5),
                  (1020, -8), (1340, -8.5), (1780, -9), (4420, -23.5), (11500, -41.5), (14300, -57.5),
                  (16000, -54.5)]
    # Spread of the crowded modes of the tray. Each row: frequency in Hz, relative level in dB per Hz.
    tray_colour = [(180, -35.5), (300, -16), (593, -13), (680, 0.5), (870, -8.5), (1080, 1), (1810, -4.5),
                   (3240, 5), (10900, -10), (14700, -24.5), (16000, -33)]
    # Reverberation of the kitchen. Each row: frequency in Hz, t60 in seconds.
    kitchen_t60 = [(100, 1), (400, 0.3), (1500, 0.37), (5000, 0.44), (14000, 0.29)]
    # Strength of the reverberation. Each row: frequency in Hz, level in dB relative to the direct sound.
    kitchen_echo = [(100, -12.5), (400, -7.5), (1500, -8), (5000, -14.5), (14000, -13)]
    # Stereo width. Each row: frequency in Hz, side level in dB relative to the mid.
    stereo_width = [(150, -32), (300, -18), (550, -16), (1200, -21.5), (4500, -29.5), (8000, -7.5),
                    (14000, -5)]

    bin_body = plastic(bin_colour, bin_modes, t60_mid=0.085, damping_slope=0.02)
    damped_body = plastic(bin_colour, bin_modes, t60_mid=0.028, damping_slope=0)
    rim_body = plastic(bin_colour, bin_modes + rim_modes, t60_mid=0.028, damping_slope=0)
    tray_body = plastic(tray_colour, tray_modes, t60_mid=0.045, damping_slope=0.028)

    in_bin = drops(bin_body, gain_db=14.0, hollow_db=8.0, clack_db=-5.0)
    in_bin += clumps(damped_body, gain_db=17.0, hollow_db=-4.0)
    in_bin += bangs(rim_body, gain_db=21.0, hollow_db=-1.0)
    in_bin += bumps(bin_body, gain_db=17.0, hollow_db=5.0)
    in_bin += tumble(bin_body, gain_db=24.5, thump_db=-4.5, hollow_db=0.5, tick_db=-4.5)
    in_bin += wall_ring(in_bin, gain_db=3.0, width_hz=42)

    in_tray = cracks(tray_body, gain_db=11.5, snap_db=13.0, splinter_db=4.5)
    in_tray += creak(tray_body, gain_db=13.0, snap_db=2.0, splinter_db=-5.5)
    in_tray += rustles(tray_body, gain_db=22.0)
    in_tray += scrapes(gain_db=1.0, width_hz=380, grit_db=8.5)

    ice = low_cut(in_bin, edge_hz=134) + low_cut(in_tray, edge_hz=330)
    pings = clinks(gain_db=4.5, upper_db=3.5, detune=0.011)
    room = walls(ice, level_db=-11.5, t60=0.13)
    room += echoes(ice + pings, kitchen_echo, kitchen_t60, delay_s=0.00073)
    mid = ice + pings + bounces() + room + hum(hum_db=0.5, boom_db=-54.5) + air(level_db=-76.5)
    side = echoes(mid, stereo_width, [(100, .06), (10000, .01)], delay_s=0)   # (Hz, t60 s)
    side += walls(ice, level_db=-36.5, t60=.3)
    side += side_air(level_db=-77.5, edge_hz=450)
    return np.array([mid + side, mid - side]) * from_db([[-.25], [.25]])   # the right is slightly louder


def record(dry):
    """Saturation and band limiting: the highest peaks are rounded and the top is cut steeply."""
    ceiling = .165
    rounded = dry / (1 + (dry / ceiling) ** 6) ** (1 / 6)
    return signal.sosfilt(signal.ellip(10, .1, 80, CUTOFF_HZ, fs=SR, output="sos"), rounded)


dry = scene()
out = record(dry)
generate_wav(out)
```